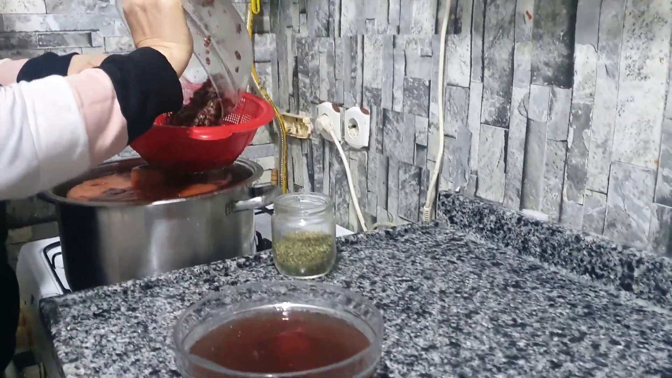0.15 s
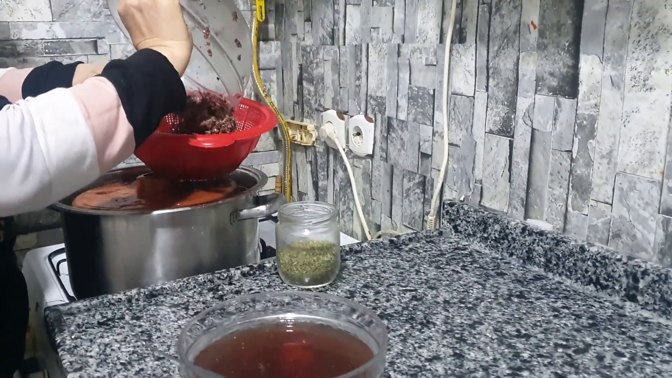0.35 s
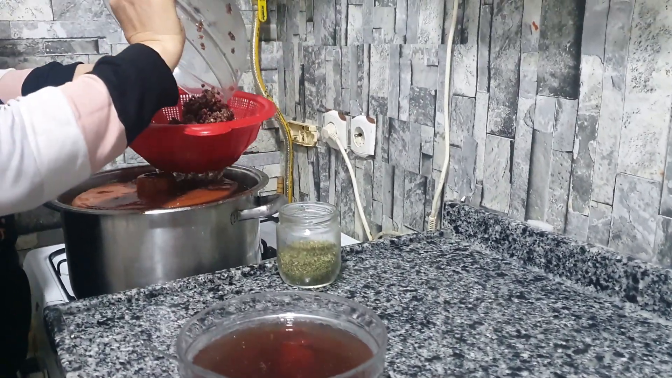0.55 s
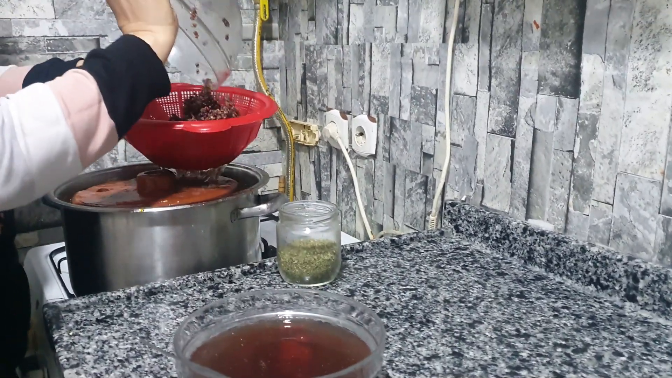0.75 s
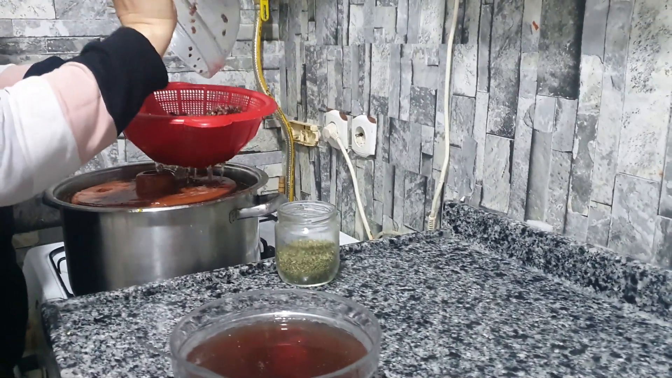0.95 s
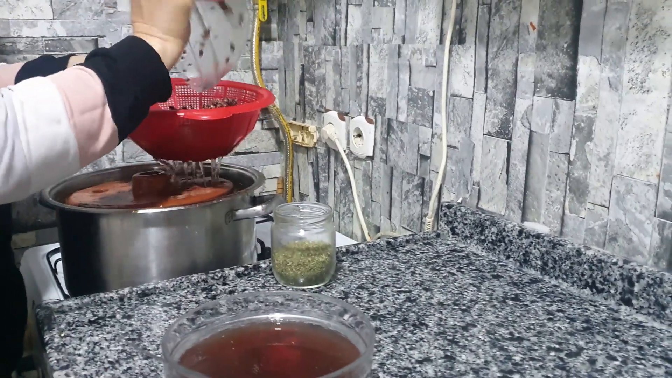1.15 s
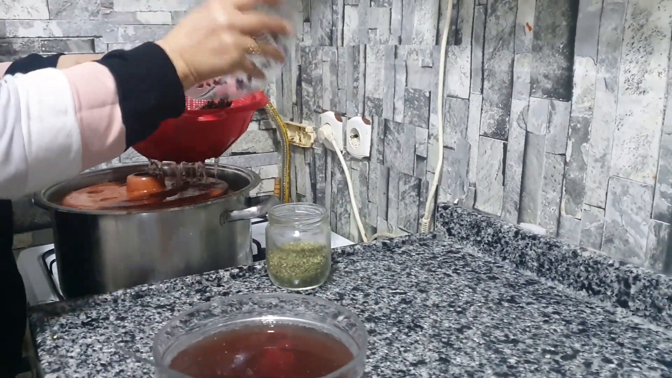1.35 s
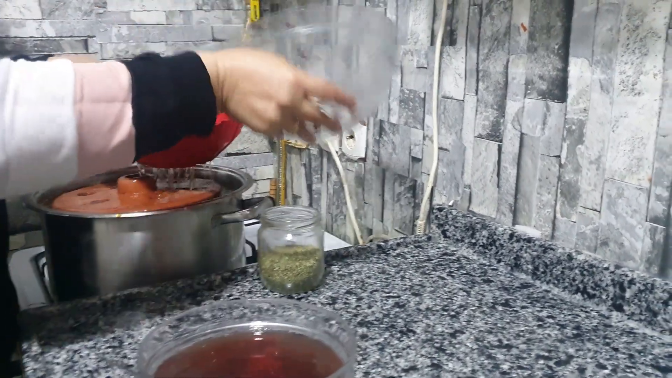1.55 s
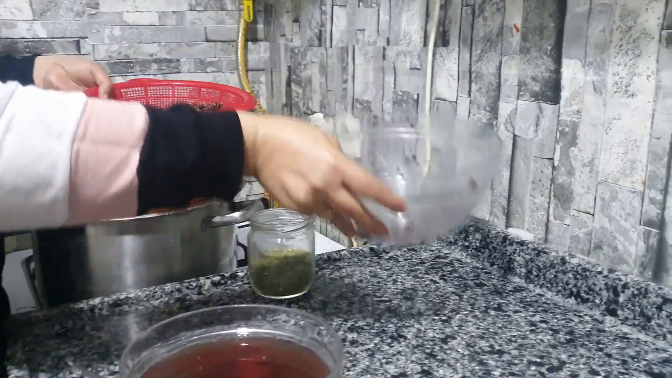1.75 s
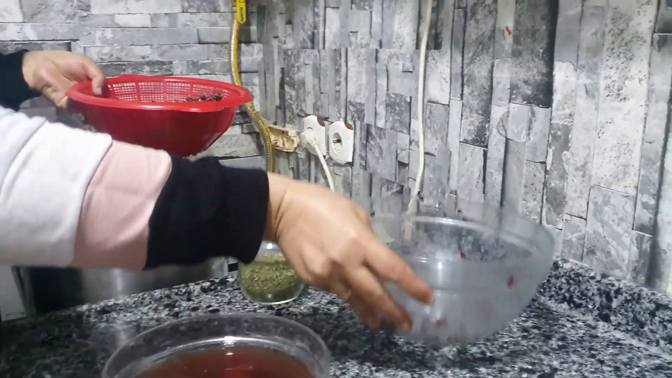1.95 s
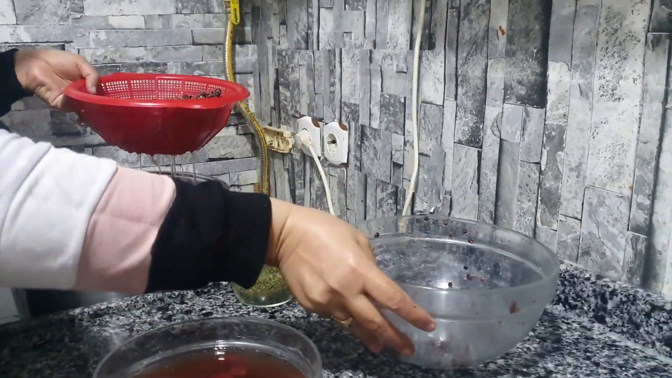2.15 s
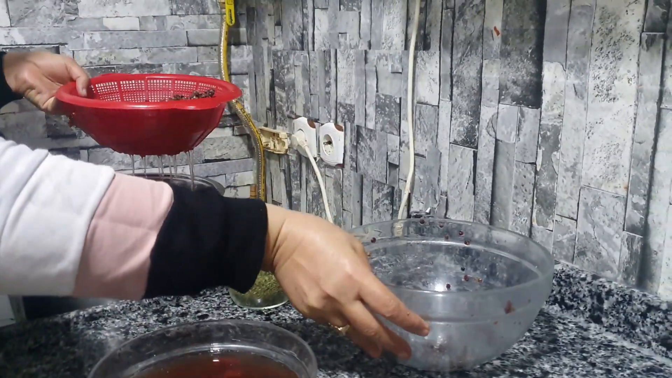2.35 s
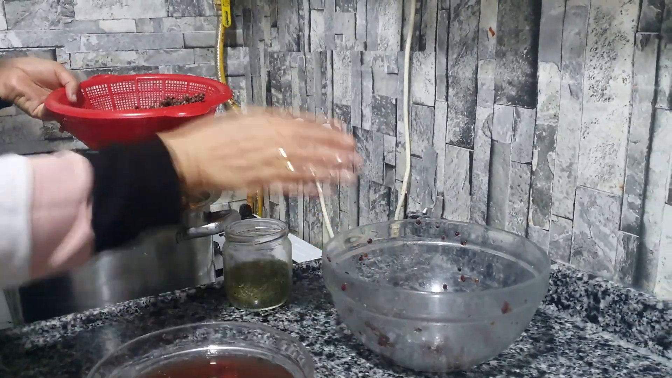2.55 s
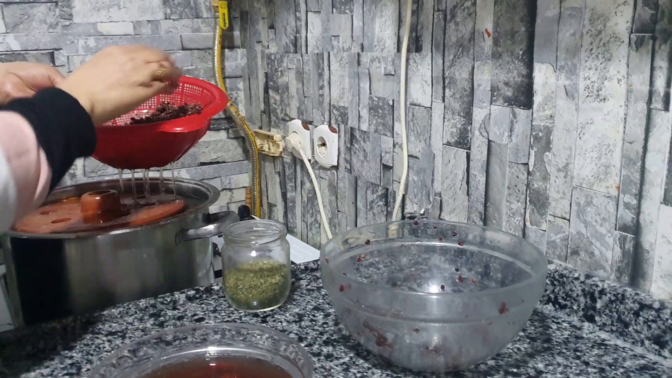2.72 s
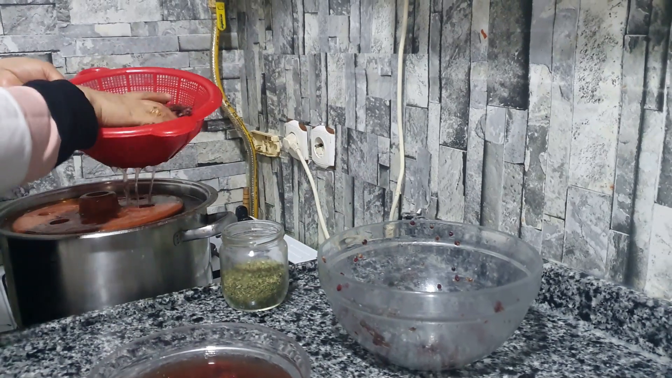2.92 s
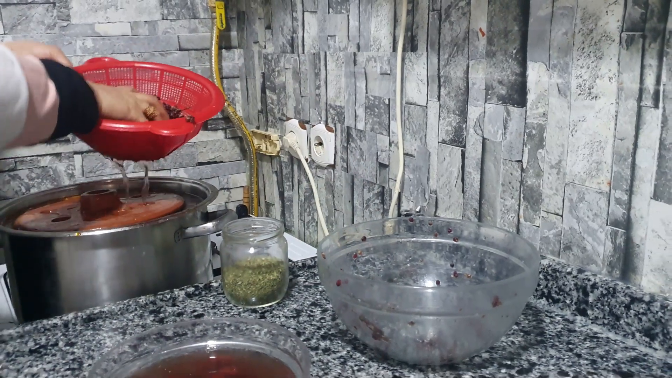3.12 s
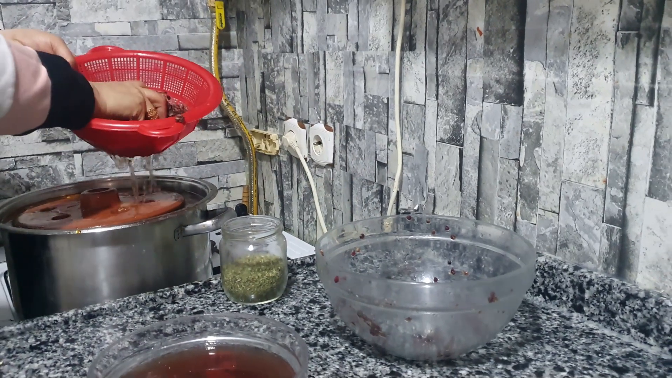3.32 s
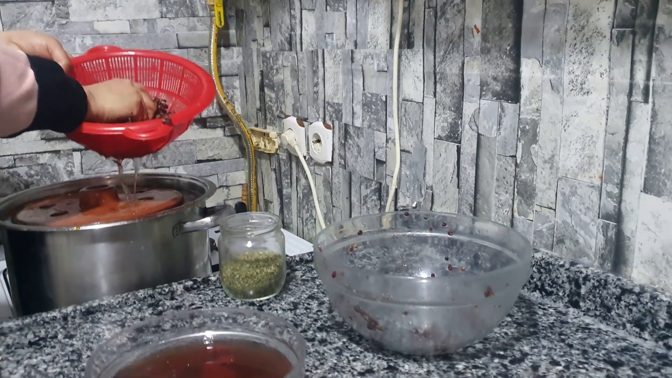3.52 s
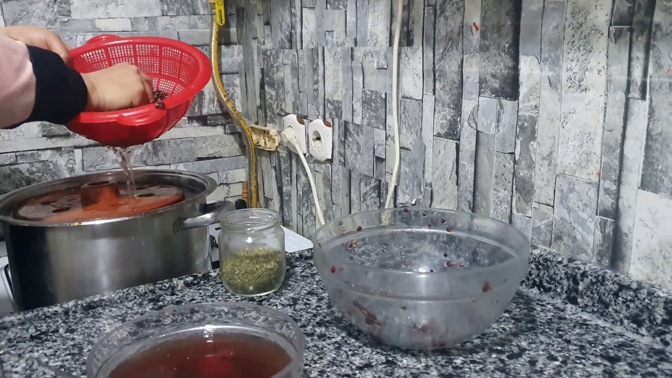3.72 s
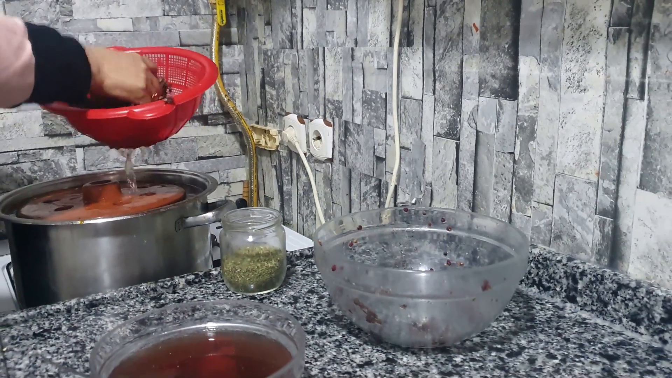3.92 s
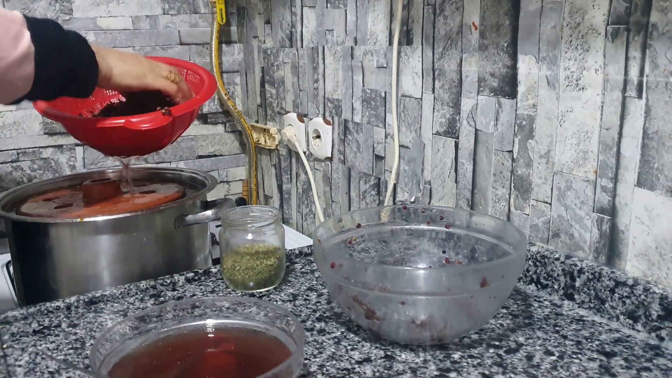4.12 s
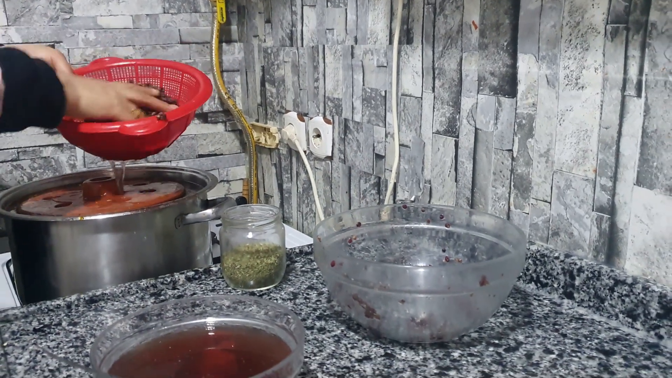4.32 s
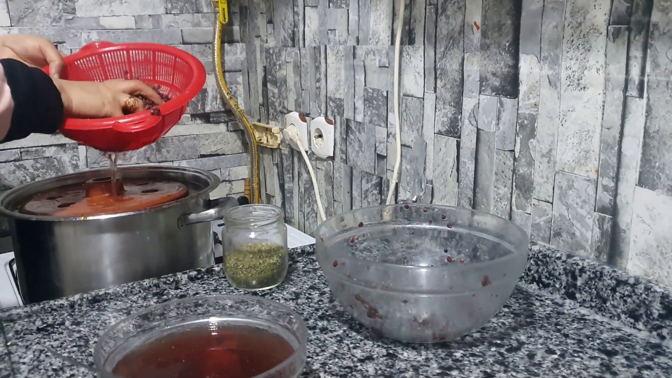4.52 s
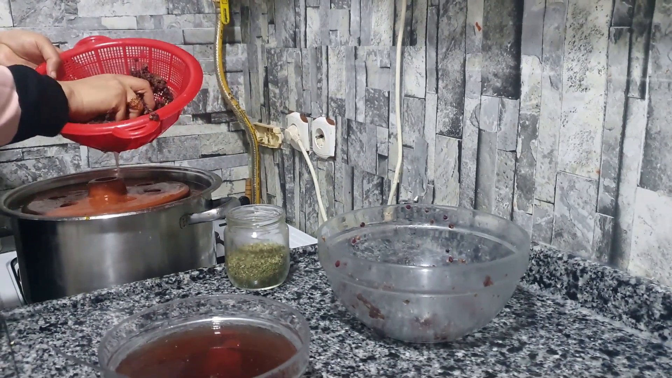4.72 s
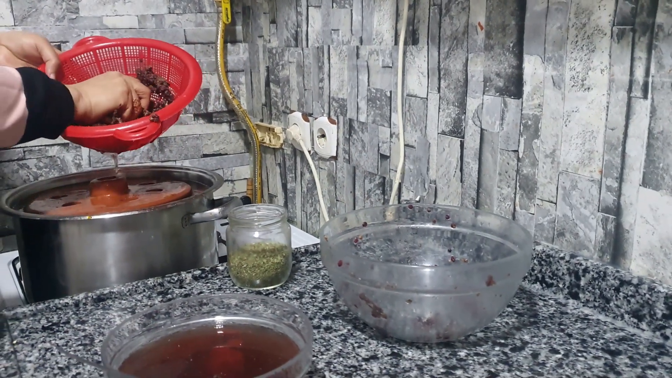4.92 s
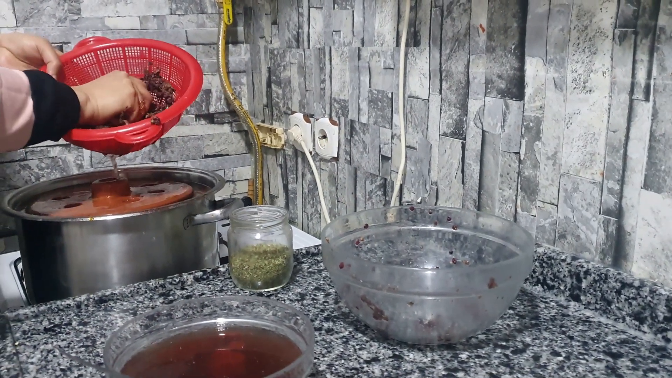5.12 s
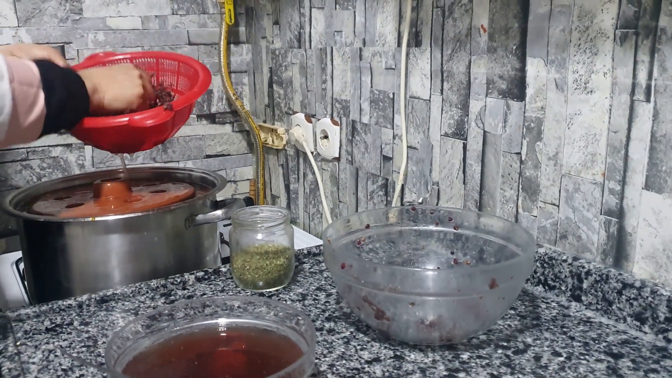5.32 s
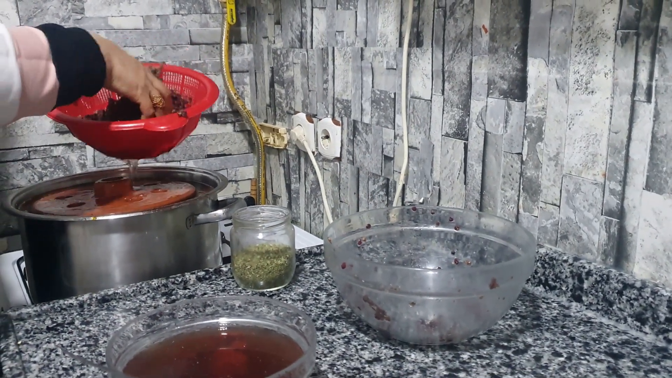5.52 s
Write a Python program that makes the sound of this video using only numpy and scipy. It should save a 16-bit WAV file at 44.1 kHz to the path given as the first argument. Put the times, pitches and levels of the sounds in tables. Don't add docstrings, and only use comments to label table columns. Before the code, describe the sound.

A small, hard-walled kitchen with short, lively echoes and a low, soft fridge hum, heard in stereo on a phone near a stone counter. From 0 s, juice pours through a plastic colander into a pot of liquid: a busy gurgle with fine fizz and clear, round plops, thickest in the first half second, plus dull plastic knocks. It thins to separate drips, with small surges near 1 and 1.3 s and faint low shudders from the pot. At about 2.1 s an empty plastic bowl briefly skids and slams onto the counter, by far the loudest sound, a hard, hollow crack with a low thud and a glass jar's clink. It bounces at 2.26 and 2.33 s, weaker each time. The hum drops, then creeps back. From 2.5 s to the end near 5.7 s, squeezed pulp releases quieter, irregular drips, flat little slaps and crisp splashes, clustered around 4.2 and 5.6 s.

```python
import sys
import numpy as np
from scipy import signal
from scipy.fft import irfft
from scipy.io import wavfile
from scipy.ndimage import uniform_filter1d

SR = 44100
rng = np.random.default_rng(int(sys.argv[2]) if len(sys.argv) > 2 else 0)


def elevation(decibels):
    levels = np.asarray(decibels, float)
    return 10 ** (levels / 20)


def wav_out(sig):
    wavfile.write(sys.argv[1], SR, np.round(np.clip(np.atleast_2d(sig).T, -1, 1) * 32767).astype(np.int16))


N = 250047

# pitch_hz, likeness (1 = the same)
LIKENESS = [(40, 1), (200, 0.92), (400, 0.71), (1000, 0.12), (3000, 0.11), (12000, 0.072)]
# pitch_hz, level_db
LEAN = [(60, -2), (150, -3), (380, 0.5), (950, -3), (2380, -1.5), (5980, 3), (15000, -3)]


def evened(x):
    return x / np.sqrt(np.mean(x ** 2) + 1e-20)


def read(points, hz):
    f, value = np.transpose(points)
    return np.interp(np.log(hz + 1), np.log(f + 1), value)


def curve(rows, order):
    rows = np.array(rows)
    return np.interp(np.arange(N) / SR, rows[:, 0], rows[:, order])


def add(mix, start_s, sound):
    part = mix[round(start_s * SR):][:len(sound)]
    part += sound[:len(part)]


def band_noise(noise, low_hz, high_hz, order=2):
    return signal.lfilter(*signal.butter(order, [low_hz, high_hz], "bandpass", fs=SR), noise)


def splash(low_hz, high_hz, decay_s, count):
    noise = rng.standard_normal(count) * np.exp(-np.arange(count) / SR / decay_s)
    noise = band_noise(noise, low_hz, min(high_hz, .45 * SR))
    return noise / abs(noise).max()


def bubble(hz, cycles, glide, rise=.2):
    turns = np.arange(round(SR * 4 * cycles / hz)) * hz / SR
    swell = 1 - np.exp(-turns / rise)
    return np.sin(2 * np.pi * turns * (1 + glide * turns / cycles)) * np.exp(-turns / cycles) * swell


def ring(modes_hz, modes, count):
    t = np.arange(count) / SR
    return sum(elevation(db - 60 * t / t60) * np.sin(2 * np.pi * hz * t)
               for hz, (db, t60) in zip(modes_hz, modes))


def hiss(gain, patchy_db):
    hz = np.fft.rfftfreq(2048, 1 / SR)
    a, b, c, d, patches = rng.standard_normal((N // 512 + 5, 1025, 5)).T
    patches = evened(uniform_filter1d(uniform_filter1d(patches, 30, axis=0), 6, axis=1))
    same = np.clip(read(LIKENESS, hz), -1, 1)[:, None]
    left = a + 1j * b
    right = same * left + np.sqrt(1 - same ** 2) * (c + 1j * d)
    lean = read(LEAN, hz) / 2
    colour = (gain(hz) * elevation(np.array([lean, -lean])))[..., None]
    z = np.array([left, right]) * colour * elevation(patchy_db * patches)
    return evened(signal.istft(z, nperseg=2048, noverlap=1536)[1][:, :N])


def fridge():
    # pitch_hz, level_db (per Hz)
    room = [(21, -38.5), (35, -2), (123, -1), (176, -7.5), (379, -5.5), (443, -10.5), (516, -8),
            (1200, -21.5), (1590, -13.5), (3270, -31.5), (7230, -24), (8870, -33.5), (12100, -30),
            (16000, -32)]
    motor_hz = [40, 84, 124, 140, 198, 442]
    # width_hz, level_db
    motor = [(1.7, -61.5), (16, -64.5), (6.6, -62.5), (3.3, -62.5), (12, -68.5), (14, -63.5)]
    out = elevation(-55.5) * hiss(lambda hz: elevation(read(room, hz)), 2.7)
    t = np.arange(N) / SR
    for hz, (width_hz, db) in zip(motor_hz, motor):
        a, b = rng.standard_normal((2, N + SR))
        r = np.exp(-np.pi * width_hz / SR)
        drift = signal.lfilter([1], [1, -r], a + 1j * b)
        drift = signal.lfilter([1], [1, -r], drift)[SR:]
        drift /= abs(drift) ** 0.44
        tone = evened((drift * np.exp(2j * np.pi * hz * t)).real)
        lean = read(LEAN, hz) / 2
        out += elevation(db + np.array([[lean], [-lean]])) * tone
    return out * elevation(duck_db())


def stream(per_s=700., spread_db=5.0):
    # start_s, level_db
    flow = [(0, -48), (.22, -52), (.4, -55.5), (.6, -65), (1, -56), (1.15, -80), (1.45, -63), (1.85, -69),
            (2, -57.5), (2.5, -70), (2.8, -72), (3.2, -63), (3.8, -67), (4.2, -64.5), (4.5, -66.5),
            (4.8, -64), (5.3, -67), (5.67, -68.5)]
    # pitch_hz, level_db
    gurgle = [(500, -12), (900, -12.5), (1500, 0), (2100, 2.5), (2800, -12), (4000, -0.5)]
    # pitch_hz, level_db (per Hz)
    fizz = [(1470, -31.5), (2500, -7), (3360, -4.5), (7530, -8.5), (8940, -20), (11900, -6.5), (15200, -14),
            (16000, -26.5)]
    size = elevation(spread_db * np.minimum(rng.exponential(1, N), 3)) * (rng.random(N) < per_s / SR)
    kind, out = rng.integers(0, 30, N), np.zeros(N)
    at = np.flatnonzero(size)
    for k, hz in enumerate(np.geomspace(gurgle[0][0], gurgle[-1][0], num=30)):
        grain = elevation(read(gurgle, hz)) * bubble(hz, 3.5, 0.056, rise=.6)
        for i in at[kind[at] == k]:
            add(out, i / SR, size[i] * grain)

    pops = elevation(3.0 * np.minimum(rng.exponential(1, N), 2.8)) * (rng.random(N) < 300. / SR)
    crackle = rng.standard_normal(N) * pops
    colour = irfft(elevation(read(fizz, np.fft.rfftfreq(256, 1 / SR))))
    crackle = signal.oaconvolve(crackle, np.roll(colour, 128), "same")
    flow_db = curve(flow, order=1)
    fizz_db = -76 + 1.28 * (flow_db + 63)
    return elevation(flow_db - 6.5) * evened(out) + elevation(fizz_db) * evened(crackle)


def drops():
    # start_s, level_db (peak), pitch_hz, ring_cycles
    plops = [(0.0024, -35.5, 2040, 5.6), (0.02, -44, 1380, 4.8), (0.0992, -36, 2160, 7.8),
             (0.1218, -32, 1830, 3.3), (0.1444, -39, 1850, 4.6), (0.169, -31.5, 2170, 4.9),
             (0.181, -36, 2000, 6), (0.1934, -33, 1950, 6.7), (0.212, -37, 1900, 6), (0.03, -39, 2100, 6),
             (0.361, -40, 1650, 6), (0.3366, -40, 1650, 7.9), (0.3705, -34.5, 1780, 6.1),
             (0.4299, -43, 1926, 10), (0.465, -40, 1970, 5), (0.5057, -37, 1990, 3.1),
             (0.6581, -40, 1620, 7.3), (0.7534, -41.5, 1890, 4.7), (0.863, -37.5, 1415, 5.9),
             (0.914, -34.5, 1720, 2), (1.0194, -51, 1820, 3.5), (1.2336, -35.5, 1440, 4.2),
             (1.3183, -31, 2130, 8.2), (1.327, -35.5, 2880, 8.3), (1.3275, -42, 2100, 5.1),
             (1.382, -42.5, 1960, 12), (0.541, -46.5, 1140, 7.8), (0.586, -46, 1840, 5),
             (1.46, -43.5, 1760, 9.7), (1.9675, -41, 2290, 4.3), (2.0392, -41.5, 1770, 4.5),
             (2.594, -53, 3230, 12), (2.914, -44.5, 2280, 3.5), (2.9235, -40, 2150, 4.1),
                  (2.9503, -33, 1760, 1.9), (3.048, -49, 1840, 5.6), (3.2864, -40, 1400, 2.9),
                  (3.4311, -40.5, 2150, 6.4), (3.4595, -43.5, 2030, 9.8), (3.597, -44, 2850, 11),
                  (4.0685, -47.5, 1420, 3.9), (4.126, -41, 1750, 3.7), (4.1446, -37, 1350, 2.6),
                  (4.1898, -38.5, 2300, 2.9), (4.21, -43, 1750, 6.2), (4.338, -35.5, 1770, 2.8),
                  (4.3539, -34, 1450, 2.8), (4.3797, -35.5, 1730, 2.2), (4.996, -32, 2370, 2.5),
                  (5.2795, -47, 1170, 2.5), (5.478, -47, 1850, 6.4), (5.5916, -42, 1400, 4.5),
                  (5.6217, -38.5, 1420, 4)]
    # start_s, level_db (peak), pitch_hz
    ticks = [(0.017, -44, 5560), (0.11, -41.5, 3650), (0.3177, -43, 3090), (0.361, -44, 3080),
             (0.4554, -47, 6450), (0.48, -42.5, 3730), (0.6608, -43, 2440), (0.778, -43, 6640),
             (0.8698, -47, 2500), (0.9085, -47, 5800), (1.098, -36, 2660), (1.1464, -49, 2600),
             (1.1607, -37.5, 7400), (1.263, -44.5, 3850), (1.3, -41.5, 4220), (1.275, -57, 5100),
             (1.186, -55.5, 4870), (1.147, -46, 3460), (0.09, -50, 4800), (0.198, -38, 4640),
             (0.187, -46, 5540), (0.495, -50, 4800), (1.541, -47.5, 5250), (1.661, -51, 2750),
             (1.732, -43, 7800), (1.923, -50, 7230), (1.955, -44.5, 7240), (1.99, -37.5, 6740),
             (2.037, -43, 2890), (2.0737, -44.5, 6400),
             (2.517, -46, 7210), (2.6586, -49.5, 5710), (2.665, -50.5, 4520), (2.478, -60, 6440),
                  (2.48, -57, 3690), (2.567, -56.5, 5500), (3.435, -52, 4310), (2.78, -46, 3970),
                  (2.782, -50.5, 3070), (2.889, -52, 2617), (3.05, -48, 8120), (3.237, -50.5, 4060),
                  (3.272, -42, 5900), (3.307, -44.5, 6600), (3.405, -44.5, 6540), (3.429, -51.5, 2710),
                  (3.5812, -46, 4520), (3.7598, -62, 6180), (3.9365, -46.5, 5080), (4.0675, -52.5, 2620),
                  (4.209, -56, 2600), (4.336, -56, 2510), (4.6848, -48.5, 2570), (5.214, -49.5, 6770),
                  (5.504, -52.5, 7400)]
    out = np.zeros(N)
    small = [(s, db, hz, 10, 0.4) for s, db, hz in ticks]
    large = [(*row, .15) for row in plops]
    for s, db, hz, cycles, share in large + small:
        wet = np.clip(share + 0.002 * (db + 42.5), 0, 1)
        add(out, s, elevation(db + 3.5) * wet * splash(0.66 * hz, 1.67 * hz, 0.0019, 400))
        tone = bubble(hz, max(cycles, .5), 0.026, rise=.22 * cycles)
        add(out, s, elevation(db + 6.0) * max(1 - wet, 0) * tone)
    return out


def slaps():
    # start_s, level_db (peak), pitch_hz (centre)
    slap_list = [(0.079, -37, 1290), (0.171, -31, 1410), (0.176, -42, 5000), (0.205, -38.5, 5500),
                 (0.11, -38.5, 5500), (0.711, -39, 4530), (1.0981, -43, 3520), (1.2274, -39, 1490),
                 (2.477, -56, 4940), (2.9253, -43.5, 1580), (3.049, -64, 1940), (3.128, -60, 905),
                 (3.246, -59, 1400), (3.433, -44, 2100), (3.956, -53, 1897), (4.068, -55, 1890),
                 (4.128, -44, 1600), (4.177, -41, 1590), (4.2, -49, 2080), (4.221, -57, 1900),
                 (4.339, -38.5, 1720), (4.478, -54.5, 800), (4.61, -46.5, 1580), (4.82, -46, 1860),
                 (5.177, -57, 904), (5.341, -49, 1140), (5.471, -45, 1390), (5.602, -52, 2040),
                 (4.7225, -47, 3000), (4.9956, -45, 2200), (5.01, -48, 1300), (5.285, -41, 1580),
                 (5.2132, -43, 1484), (5.5896, -34.5, 1900), (5.621, -44.5, 2000)]
    width = 1.69
    out = np.zeros(N)
    for s, db, hz in slap_list:
        add(out, s, elevation(db) * splash(hz / width, width * hz, 0.0028, 400))
    return out


def colander():
    # start_s, level_db (peak), pitch_hz
    knocks = [(0.0791, -30, 1200), (0.102, -40, 1000), (0.172, -36, 1100), (0.42, -46, 900),
              (0.246, -42, 700), (0.2995, -33.5, 910), (0.582, -51, 675), (0.643, -43.5, 670),
              (0.714, -38, 650), (0.830, -44.5, 635), (0.935, -45, 587), (0.967, -38.5, 670),
              (1.2271, -34, 810), (1.483, -40, 500), (1.499, -38.5, 654), (1.767, -41, 530),
              (1.907, -45.5, 693), (3.317, -43.5, 756), (3.748, -54.5, 557)]
    out = np.zeros(N)
    for s, db, hz in knocks:
        cycles = 1.45 - 0.03 * (db + 39.5)
        add(out, s, elevation(db + 5.5) * bubble(hz, max(cycles, .4), 0))
        add(out, s, elevation(db - 8.0) * bubble(2.4 * hz, 0.65, 0))
        add(out, s, elevation(db - 3.0) * bubble(0.34 * hz, 1.6, 0))
    return out


def spray():
    # start_s, level_db (peak), pitch_hz
    spray_list = [(0.172, -44, 15100), (0.202, -42.5, 13800), (0.3434, -44.5, 15400), (0.4449, -54, 13400),
                  (0.5452, -55, 14900), (0.714, -53, 12300), (0.7784, -52, 12300), (0.9144, -50, 11800),
                  (1.3825, -49, 15400), (1.559, -47, 11800), (1.74, -47.5, 14200), (1.7707, -47.5, 11100),
                  (1.921, -51, 11190), (1.9513, -45.5, 13310), (2.072, -51, 9800),
                  (2.514, -52.5, 12320), (2.66, -58, 14700), (2.714, -56.5, 9670), (2.779, -56, 11900),
            (2.8364, -58.5, 11600), (3.242, -55, 10000), (3.2876, -52, 12000), (3.3967, -55, 10600),
            (3.4485, -54, 11300), (3.7485, -58, 10290), (3.9356, -53.5, 14430), (4.4938, -56, 12900),
            (4.616, -53, 12500), (4.7186, -54, 11400), (4.9177, -49.5, 10900), (4.997, -59, 11460),
            (5.213, -58.5, 10940), (5.63, -54, 15500)]
    out = np.zeros(N)
    for s, db, hz in spray_list:
        add(out, s, elevation(db + 8.5) * splash(0.81 * hz, 1.3 * hz, 0.0021, 300))
    return out


def bursts():
    # start_s, level_db (peak), lowest_hz
    burst_list = [(2.5136, -50, 6000), (2.6586, -44, 4000), (2.7137, -53, 7100), (2.7955, -50, 10500),
                  (2.9, -56, 7000), (3.4305, -39, 3000), (3.467, -45, 4400), (3.3, -46, 4100),
                  (4.2, -43, 1800), (5.5, -41, 2500), (4.7185, -35.5, 1800), (4.727, -48, 2000),
                  (4.3, -57, 2500), (5.7, -45, 1700), (1.918, -52, 2500), (1.742, -46, 3000),
                  (0.7125, -49, 3000), (5.214, -50, 2300), (5.589, -48, 2500), (4.339, -52, 2500),
                  (2.928, -54, 7000), (4.128, -56, 2500), (4.4938, -70, 5700), (3.05, -56, 6400)]
    decay_s = .004
    out, count = np.zeros(N), np.arange(900)
    for s, db, hz in burst_list:
        noise = rng.standard_normal(900) * np.exp(-count / SR / decay_s) * (1 - np.exp(-count / 30.))
        noise = signal.lfilter(*signal.butter(2, hz, "highpass", fs=SR), noise)
        add(out, s, elevation(db) * noise / abs(noise).max())
    return out


def thuds():
    # start_s, pitch_hz, level_db, t60_s (time to die by 60 dB)
    thud_list = [
        (0.719, 88.5, -40, 0.22),
        (1.23, 92, -38, 0.14),
        (1.489, 90, -42, 0.19),
        (2.119, 125, -28, 0.18),
        (2.117, 285, -35, 0.14),
        (2.26, 145, -31.5, 0.16),
        (2.261, 307, -38, 0.12),
        (2.333, 322, -37.5, 0.1),
        (2.361, 83.4, -43.5, 0.34),
    ]
    out = np.zeros(N)
    rise = 1 - np.exp(-np.arange(12000) / 490.0)
    for s, hz, db, t60 in thud_list:
        add(out, s, ring([hz], [(db, t60)], count=12000) * rise)
    return out * elevation([[-1], [1]])


def skid():
    start_s, end_s = 2.097, 2.1145
    level_db, rise_db = -20, 23
    out, t = np.zeros(N), np.arange(start_s, end_s, 1 / SR)
    chatter = band_noise(rng.standard_normal(4000), 1264, 2200.)[-len(t):]
    swell = elevation(level_db - rise_db * (end_s - t) / (end_s - start_s))
    add(out, start_s, swell * evened(chatter))
    return out


def jar():
    # start_s, level_db
    clinks = [
        (2.099, -57),
        (2.116, -35),
        (2.2597, -39),
        (2.332, -54),
    ]
    glass_hz = [2649, 2673, 4678, 4740, 6650, 7101, 7560, 7817, 8646, 9685, 10550, 11700, 12480, 12550]
    # level_db, t60_s (time to die by 60 dB)
    glass_modes = [(1, 0.3), (-3, .25), (5, 0.13), (-5, 0.08), (-4, 0.12), (-8, 0.12), (-8, .08), (3, 0.11),
                   (-2, 0.096), (-1, 0.13), (-6, 0.13), (-6, .13), (3, 0.13), (-4, .12)]
    out = np.zeros(N)
    glass = ring(glass_hz, glass_modes, count=9000) * (1 - np.exp(-np.arange(9000) / 60.))
    for s, db in clinks:
        add(out, s, elevation(db) * glass)
    return out


def bowl(blows):
    shell_hz = [405, 545, 636, 685, 740, 1020, 1116, 1237, 1330, 1420, 1517, 1738, 1800, 1906, 2090, 2277,
                823, 979, 2370]
    # level_db, t60_s (time to die by 60 dB)
    shell_modes = [(-9.5, 0.16), (-8, 0.053), (-3, 0.12), (-2.5, 0.1), (-1.5, 0.071), (-7.5, 0.062),
                   (-0.5, 0.035), (-6.5, 0.07), (-8, 0.048), (-5, 0.032), (-7, .04), (-1.5, 0.037),
                   (-4.5, 0.059), (-1, 0.019), (-14.5, 0.046), (-11, 0.023), (-10, 0.05), (-8.5, 0.062),
                   (-14, 0.037)]
    out = np.zeros(N)
    shell = ring(shell_hz, shell_modes, count=6000) * (1 - np.exp(-np.arange(6000) / 14.0))
    for s, db, hz, cycles, shell_db in blows:
        turns = np.arange(-100, 300) * hz / SR
        shape = np.exp(-(turns / np.where(turns < 0, .8, cycles)) ** 2)
        add(out, s - 100 / SR, -elevation(db - 1.8) * np.cos(2 * np.pi * turns) * shape)
        add(out, s, elevation(db + shell_db) * shell)
        crack = rng.standard_normal(600) * np.exp(-np.arange(600) / 190.0)
        add(out, s - .0007, elevation(db - 20.0) * band_noise(crack, 4200., 8200., order=4))
    return out


def duck_db():
    open_db, dip_db, settled_db = 1.5, -20, -3.5
    start_s, fall_s, return_s = 2.29, 0.17, 0.62
    since = np.maximum(np.arange(N) / SR - start_s, 0)
    return open_db + (1 - np.exp(-since / fall_s)) * (settled_db + dip_db * np.exp(-since / return_s))


def kitchen(x, echo_db, tail_db):
    # pitch_hz, t60_s (time to die by 60 dB)
    room_t60 = [(150, 0.62), (500, 0.4), (1500, 0.31), (4000, 0.32), (8000, 0.23), (15000, 0.23)]
    # start_s (delay), level_db
    echoes = [
        (.0045, -2.5),
        (.009, -3),
        (.0135, -8.5),
        (.021, -8.5),
        (.032, -13),
    ]
    taps = np.zeros((2, SR // 2))
    at = np.arange(200, SR // 2 - 20, 20) + rng.integers(0, 20, (2, (SR // 2 - 201) // 20))
    np.put_along_axis(taps, at, rng.choice([-1., 1.], at.shape), 1)
    hz, t, z = signal.stft(taps, SR, nperseg=256)
    same = np.clip(0.99 * read(LIKENESS, hz), -1, 1)[:, None]
    z[1] = same * z[0] + np.sqrt(1 - same ** 2) * z[1]
    tail = signal.istft(z * elevation(-60 * t / read(room_t60, hz)[:, None]), SR, nperseg=256)[1]
    tail *= elevation(tail_db) / np.linalg.norm(tail, axis=1, keepdims=True)
    tail[:, 0] = 1
    for k, (s, db) in enumerate(echoes):
        sides = np.array([0, 7 * (-1) ** k])
        tail[[0, 1], round(s * SR) + sides] += elevation(db + echo_db)

    heard, out = np.flatnonzero(x), np.zeros((2, N))
    first, last = heard[0], heard[-1]
    wet = signal.oaconvolve(x[None, first:last + 1], tail, axes=1)[:, :N - first]
    out[:, first:first + wet.shape[1]] = wet
    return out


def ports(x, lag):
    # pitch_hz, level_db
    microphone = [(100, -7), (350, -7), (600, 1), (2500, 1.5), (3500, -2), (7500, 0.5), (9000, -4),
                  (12000, -4), (16000, -3.5)]
    hz = np.fft.rfftfreq(1024, 1 / SR)
    lean = read(LEAN, hz) / 2
    delay = np.exp(-2j * np.pi * hz / SR * np.array([[512], [512 + lag]]))
    gain = elevation(read(microphone, hz) + np.array([lean, -lean])) * delay
    return signal.oaconvolve(x, irfft(gain) * np.hanning(1024), axes=1)[:, 512:N + 512]


def scene():
    # start_s, level_db (blow), pitch_hz (contact), snap_cycles, shell_db (ring)
    blows = [(2.1075, -23, 1990, 2, -12), (2.1102, -29, 1810, 1.4, -20.5), (2.1132, -17, 1580, 2, -18),
             (2.1159, -1.5, 1335, 0.97, -15.5), (2.126, -16.5, 1400, 1.2, -13.5), (2.136, -25, 710, 2, -22),
             (2.149, -21, 1290, 2.5, -16), (2.157, -28, 1500, 2.5, -23), (2.172, -22.5, 617, 2.4, -21),
             (2.2607, -6.5, 1360, 1.5, -18), (2.2803, -19, 1390, 3, -14), (2.293, -26.5, 1380, 1.9, -25),
             (2.3327, -15, 770, 0.97, -14), (2.3335, -18, 1950, 2.3, -19), (2.3345, -21, 1400, 1.5, -20),
             (2.343, -16.5, 1730, 0.9, -19)]
    hum = fridge()
    water = kitchen(stream(), 0., 5.46)
    water += kitchen(drops(), -3.5, -4.5)
    water += kitchen(slaps() + spray() + bursts(), -7.5, 1.7)
    water += kitchen(colander(), -10.5, -5.5)
    counter = kitchen(skid(), -16, -5.0)
    glass = kitchen(jar(), -5.5, -9.5)
    for landing in (blows[:9], blows[9:12], blows[12:]):
        counter += kitchen(bowl(landing), -18.0, -2.8)
    return ports(water, lag=7.12) + ports(counter, lag=-3.5) + ports(glass, lag=-1.3) + thuds() + hum


def top_cut(x):
    return signal.sosfilt(signal.butter(12, 15930, fs=SR, output="sos"), x)


def record(dry):
    lowpass = signal.firwin(511, 15950, window=("kaiser", 9), fs=SR)
    x = signal.oaconvolve(dry, lowpass[None], "same")
    return top_cut(np.clip(x, -1, 1))


dry = scene()
out = record(dry)
wav_out(out)
```